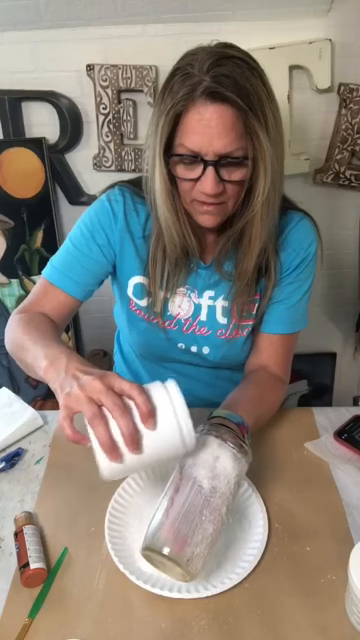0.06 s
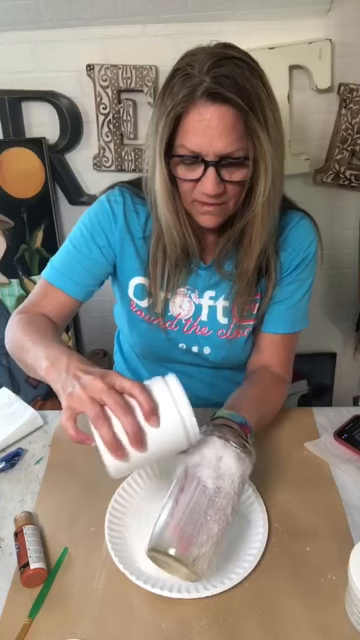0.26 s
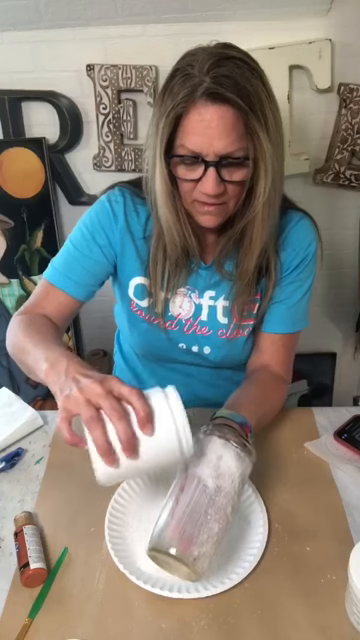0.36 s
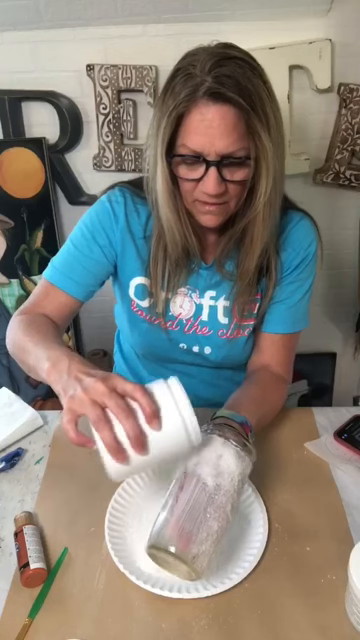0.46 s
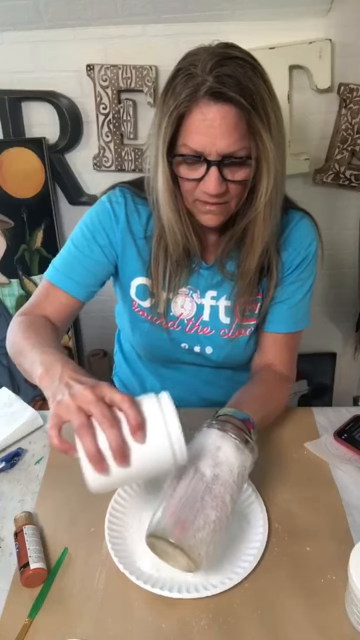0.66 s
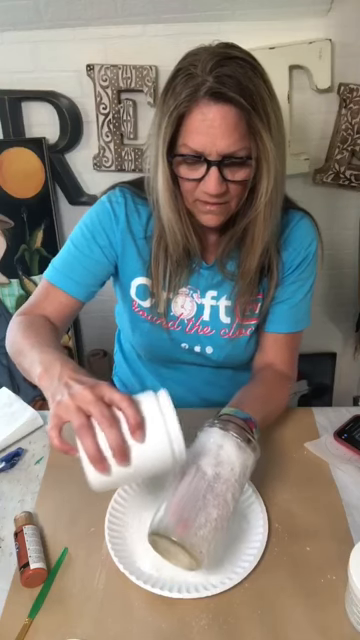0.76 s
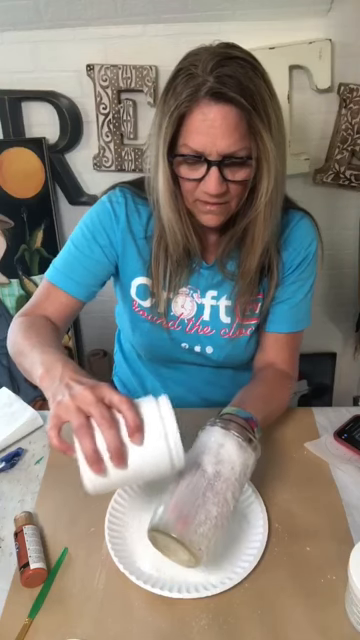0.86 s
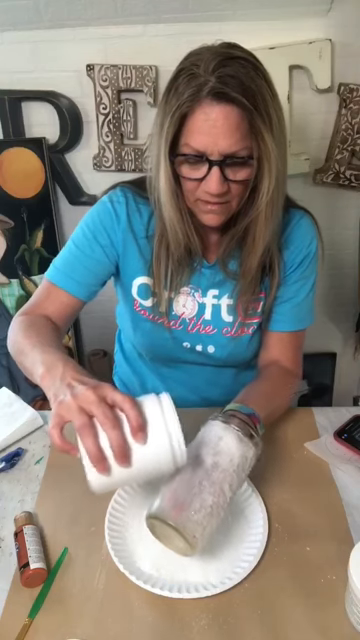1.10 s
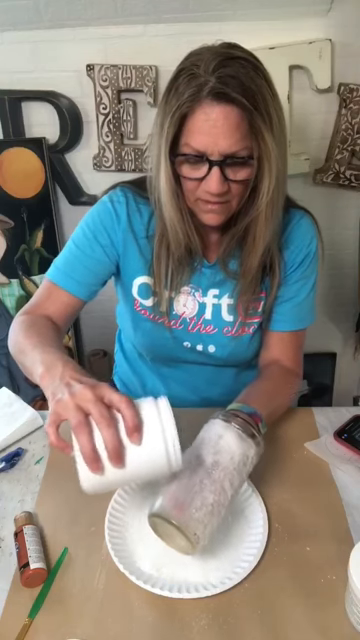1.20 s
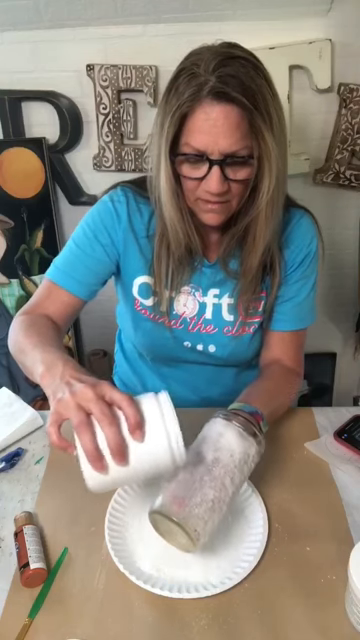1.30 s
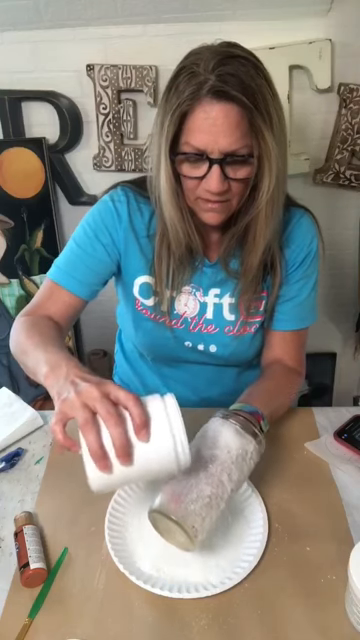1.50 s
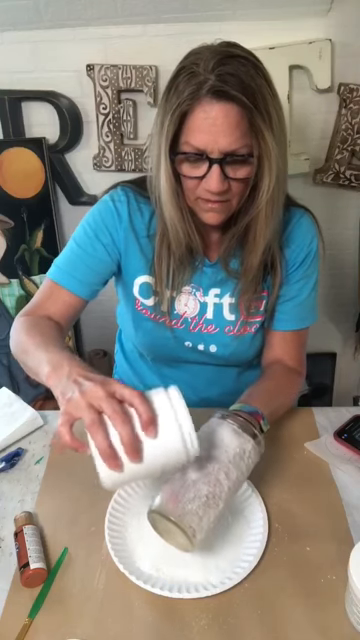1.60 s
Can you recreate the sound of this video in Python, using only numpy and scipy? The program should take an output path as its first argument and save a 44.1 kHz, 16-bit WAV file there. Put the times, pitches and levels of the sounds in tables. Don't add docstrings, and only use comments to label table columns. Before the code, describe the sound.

Dry granular sprinkling on a paper plate, bursts of small ticks with a few bright louder snaps, brief thin gaps between shakes, faint hollow jar rubs, soft room air and low rumble, close microphone, treble dulled at the top.

```python
import sys
import numpy as np
from scipy import signal
from scipy.io import wavfile
from scipy.ndimage import uniform_filter1d

SR = 44100
rng = np.random.default_rng(int(sys.argv[2]) if len(sys.argv) > 2 else 0)


def natural_amplitude(level_db):
    exponent = np.asarray(level_db, float) / 20
    return 10 ** exponent


def store_wav(level_fs):
    pcm = np.round(np.clip(np.atleast_2d(level_fs), -1, 1) * 32767)
    wavfile.write(sys.argv[1], SR, pcm.T.astype(np.int16))


N = 72765


def evened(x):
    return x / np.sqrt(np.mean(x ** 2) + 1e-20)


def colour(points, x):
    grid_hz = np.abs(np.fft.fftfreq(4096, 1 / SR))
    hz, db = np.transpose(points)
    curve_db = np.interp(np.log(grid_hz + 1), np.log(hz + 1), db)
    log_gain = np.log(natural_amplitude(curve_db) + 1e-5)
    phase = -signal.hilbert(log_gain).imag
    taps = np.fft.ifft(np.exp(log_gain + 1j * phase)).real[:2048]
    return signal.oaconvolve(x, taps / np.linalg.norm(taps))[:len(x)]


def resonate(x, hz, width_hz):
    turn = np.exp(2j * np.pi * hz * np.arange(len(x)) / SR)
    decay = np.exp(-np.pi * width_hz / SR)
    return 2 * (turn * signal.lfilter([1 - decay], [1, -decay], x / turn)).real


def resonate_twice(x, hz, width_hz):
    return resonate(resonate(x, hz, width_hz), hz, width_hz)


# start_s (the peak), level_db, swell_db_per_s, fade_db_per_s, dust_share_db
SHAKES_OF_TUB = [(.004, -51, 905, 683, -22), (0.033, -67.5, 300, 389, -3.5), (0.164, -53.5, 3000, 11, -39),
                 (0.198, -48.5, 902, 20, -15), (0.3, -45.5, 216, 253, -13), (0.335, -40, 2993, 314, -6.5),
                 (0.371, -43.5, 306, 133, -12.5), (0.478, -51.5, 300, 182, -3), (0.533, -42, 168, 143, -10),
                 (0.601, -48, 197, 47, -14.5), (0.711, -39.5, 324, 398, -2), (0.744, -40.5, 478, 112, -6.5),
                 (0.897, -48.5, 19, 498, -48), (0.992, -61, 29, 595, -3.5), (1.047, -51.5, 420, 93, -13.5),
                 (1.073, -52, 303, 343, -7.5), (1.15, -63, 43, 40, -13.5), (1.196, -48, 1512, 70, -6.5),
                 (1.232, -41.5, 324, 481, -7.5), (1.281, -47.5, 196, 309, -7.5), (1.384, -49, 198, 160, -9),
                 (1.416, -49.5, 211, 543, -6.5), (1.546, -57, 110, 207, -13), (1.602, -69, 102, 259, -8.5)]
STOP_DB_PER_S = 900


def flow():
    peak_s, db, swell, fade, dust_db = np.transpose(SHAKES_OF_TUB)[:, :, None]
    t = np.arange(N) / SR
    before = np.append([[-1]], peak_s[:-1], axis=0)
    after = np.append(peak_s[1:], [[2]], axis=0)
    outside_s = np.maximum(t - after, 0) + np.maximum(before - t, 0)
    fall_db = np.where(t < peak_s, (peak_s - t) * abs(swell), (t - peak_s) * abs(fade))
    power = natural_amplitude(db - fall_db - STOP_DB_PER_S * outside_s) ** 2
    dust_power = power * natural_amplitude(dust_db) ** 2
    return np.sqrt(power.sum(0)), np.sqrt(dust_power.sum(0))


def clumps():
    clump_db, clump_s = 1.72, 0.014
    steps = rng.standard_normal(1000)
    t = np.arange(N) / SR
    return natural_amplitude(clump_db * np.interp(t / clump_s, np.arange(len(steps)), steps))


def hits(per_s, spread_db):
    largest, even_s, slack = 2.5, 0.016, 0.35
    draw, sign = rng.random(N), rng.choice([-1., 1.], N)
    size = natural_amplitude(spread_db * np.minimum(rng.exponential(1, N), largest))
    clicks = sign * size * (draw < per_s / SR)
    clicks = clicks / np.sqrt(per_s / SR * np.mean(size ** 2))
    local_power = np.abs(uniform_filter1d(clicks ** 2, size=round(even_s * SR)))
    return clicks / np.sqrt(slack + local_power)


def grain_hits():
    return hits(4000, 3.5)


# pitch_hz, level_db
AIR_SPECTRUM = [(20, 1.5), (150, -11), (500, -8.5), (750, -12), (1000, -25), (2500, -16), (6000, -23),
                (15600, -35)]
AIR_DB, RUMBLE_DB, RUMBLE_HZ, RUMBLE_WIDTH_HZ = -80, -85, 41.7, 37
DUCK_DB, DUCK_POWER = -49, 0.21


def air(level):
    rumble = evened(resonate_twice(rng.standard_normal(N), RUMBLE_HZ, RUMBLE_WIDTH_HZ))
    duck = (1 + uniform_filter1d(level, size=2000) / natural_amplitude(DUCK_DB)) ** -DUCK_POWER
    hiss = evened(colour(AIR_SPECTRUM, rng.standard_normal(N)))
    return natural_amplitude(AIR_DB) * duck * hiss + natural_amplitude(RUMBLE_DB) * rumble


# middle_s, length_s, pitch_hz, level_db
JAR_RUBS = [(0.006, 0.21, 308, -73), (0.008, 0.11, 600, -72), (0.12, 0.27, 316, -80),
            (0.112, 0.15, 639, -76.5), (0.187, 0.076, 574, -72), (0.314, 0.1, 551, -70),
            (0.358, 0.095, 566, -65), (0.377, 0.23, 304, -71), (0.39, 0.058, 626, -73),
            (0.485, 0.13, 551, -67), (0.482, 0.079, 630, -69), (0.505, 0.12, 303, -73.5),
            (0.767, 0.13, 310, -79), (0.897, 0.076, 543, -68.5), (1.003, 0.095, 560, -69),
            (1.008, 0.092, 677, -81.5), (1.065, 0.058, 595, -75), (1.152, .06, 567, -90),
            (1.271, 0.076, 315, -81), (1.38, 0.22, 367, -76.5), (1.377, 0.12, 555, -78.5),
            (1.497, 0.13, 463, -74.5), (1.486, 0.17, 580, -77.5), (1.496, 0.1, 360, -77),
            (1.562, 0.046, 374, -79.5), (1.624, 0.1, 538, -74.5)]


def jar():
    t, out = np.arange(N) / SR, np.zeros(N)
    for middle_s, length_s, hz, db in JAR_RUBS:
        swell = np.cos(np.pi * np.clip((t - middle_s) / length_s, -.5, .5)) ** 2
        ring = resonate_twice(rng.standard_normal(N), hz, 57) * swell
        out += natural_amplitude(db) * ring / np.sqrt(np.mean(ring ** 2) / np.mean(swell ** 2))
    return out


# pitch_hz, level_db
DUST_SPECTRUM = [(2350, -48), (4000, -1.5), (4480, -3), (6240, -4), (7270, -7), (8980, -11.5),
                 (10600, -8.5), (15600, -13)]


def dust(level):
    return level * clumps() * colour(DUST_SPECTRUM, grain_hits())


PEAK_S = 0.0015


def tick(hz, scale):
    tick_s, bounce_s, bounce_db = 0.00031, 0.001328, -16.5
    t = np.arange(400) / SR - PEAK_S

    def pulse(u):
        length_s = tick_s * scale * np.where(u > 0, 1.3, 1)
        return np.exp(-(u / length_s) ** 2) * np.cos(2 * np.pi * hz * u)

    return pulse(t) + natural_amplitude(bounce_db) * pulse(t - bounce_s * scale)


# start_s (the peak), level_db, pitch_hz, brightness_db
LARGE_CRYSTALS = [(0.0042, -33.3, 2610, -28), (0.1145, -51.1, 2720, -21), (0.1349, -46.0, 2660, -36),
                  (0.1434, -43.7, 2620, -36), (0.1661, -43, 2600, -36), (0.1794, -36.5, 2500, -30),
                  (0.1819, -36, 2500, -30), (0.2151, -33.7, 2700, -24), (0.2934, -29.7, 2340, -27),
                  (0.3347, -22.4, 2610, -14), (0.3442, -29.6, 2890, -15), (0.3519, -28.2, 2680, -22),
                  (0.3654, -28.4, 2640, -25), (0.3871, -30.4, 2540, -27), (0.5406, -27.8, 2420, -19),
                  (0.5938, -28.4, 2520, -26), (0.7053, -29, 2600, -6), (0.708, -19.8, 2900, -18),
                  (0.7157, -31, 2800, -3), (0.7359, -21, 2880, -30), (0.7367, -18.4, 2880, -18),
                  (0.7377, -25, 2700, -30), (0.8753, -32.3, 2590, -22), (1.0469, -32.6, 2580, -22),
                  (1.0925, -38.0, 2740, -25), (1.1227, -44.2, 2410, -23), (1.1907, -35.0, 2770, -23),
                  (1.206, -24.7, 2700, -19), (1.2749, -32.1, 2510, -19), (1.5381, -43.0, 2740, -22)]
SNAP_S, SNAP_GAIN = 0.0018, 0.92


def large_crystals():
    out, t = np.zeros(N + 400), np.arange(400) / SR
    for s, db, hz, bright_db in LARGE_CRYSTALS:
        scale = 1 + 0.21 * np.tanh(rng.standard_normal())
        noise = evened(colour(DUST_SPECTRUM, rng.standard_normal(400)))
        snap = noise * np.exp(-np.abs(t - PEAK_S) / SNAP_S)
        at = round((s - PEAK_S) * SR)
        out[at:at + len(t)] += natural_amplitude(db) * (tick(hz, scale) + SNAP_GAIN * natural_amplitude(bright_db) * snap)
    return out[:N]


# pitch_hz, level_db
PLATE_SPECTRUM = [(800, -41.5), (1300, -11), (1700, -6), (2200, -0.5), (2900, -3), (3600, -6), (4500, -21),
                  (6500, -18.5), (9000, -51)]
FULL_DB, PER_S, THIN = -45, 900, 0.5
PATCH_WIDTH_HZ, DIRECT, BED = 3000, 0.74, 0.4
THUD_HZ, THUD_WIDTH_HZ, THUD_DB, THUD_GROWTH = 1108, 355, -60, 1.64


def stream(level):
    heavy = level / natural_amplitude(FULL_DB)
    train = hits(PER_S * np.clip(heavy, .1, 1) ** THIN, 3.2)
    train = train + BED * grain_hits()
    patch, out = rng.integers(0, 12, N), np.zeros(N)
    for k, hz in enumerate(np.geomspace(1300, 4200, num=12)):
        struck = train * (patch == k)
        out += resonate(struck, hz, PATCH_WIDTH_HZ) + DIRECT * struck
    ticks = level * evened(colour(PLATE_SPECTRUM, out))
    thud = evened(resonate_twice(train, THUD_HZ, THUD_WIDTH_HZ))
    return clumps() * (ticks + natural_amplitude(THUD_DB) * heavy ** THUD_GROWTH * thud)


def room(x):
    near_t60_s, near_db = 0.025, -13
    room_t60_s, room_db = 0.2, -17
    t = np.arange(SR // 2) / SR
    echoes = rng.choice([-1., 1.], len(t)) * (rng.random(len(t)) < .08) * (t > .002)
    near = echoes * natural_amplitude(-60 * t / near_t60_s)
    far = echoes * natural_amplitude(-60 * t / room_t60_s)
    tail = natural_amplitude(near_db) * near / np.linalg.norm(near) + natural_amplitude(room_db) * far / np.linalg.norm(far)
    return x + signal.fftconvolve(x, tail)[:N]


def scene():
    crystals, fines = flow()
    on_table = stream(crystals) + dust(fines) + large_crystals()
    return (room(on_table) + jar() + air(crystals))[None]


def roll_off(x):
    return signal.sosfilt(signal.butter(12, 15740, fs=SR, output="sos"), x)


def record(dry):
    edge = signal.firwin(511, 15750, window=("kaiser", 9), fs=SR)
    mix = signal.oaconvolve(dry, edge[None], "same")
    return roll_off(mix)


dry = scene()
out = record(dry)
store_wav(out)
```